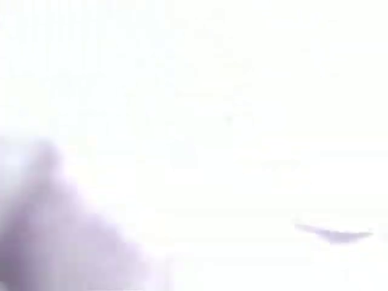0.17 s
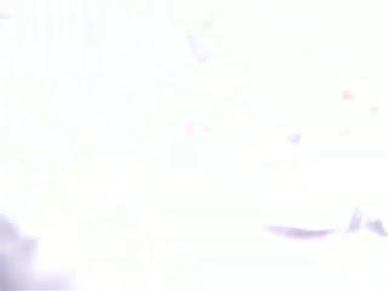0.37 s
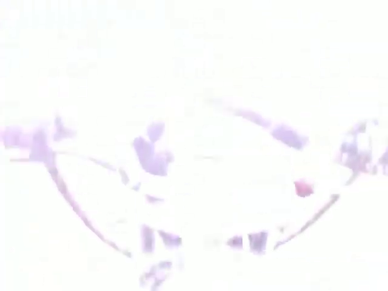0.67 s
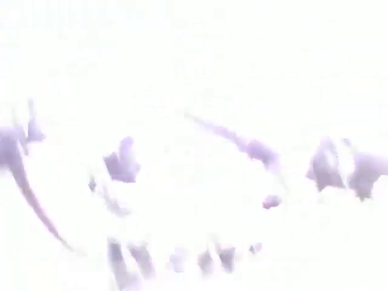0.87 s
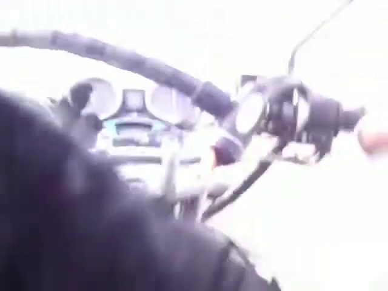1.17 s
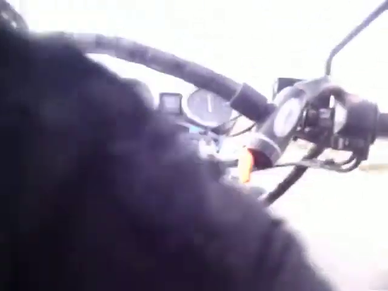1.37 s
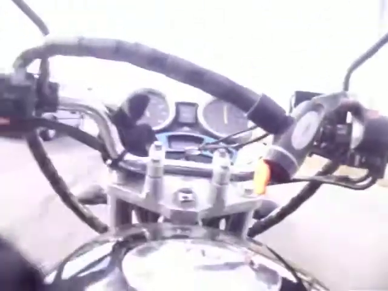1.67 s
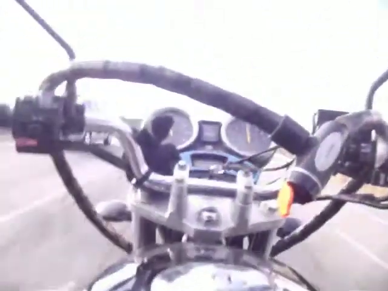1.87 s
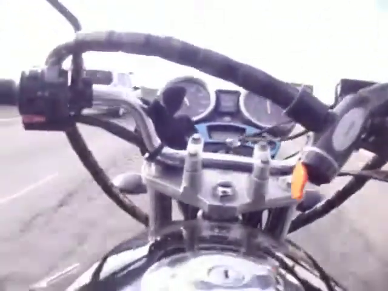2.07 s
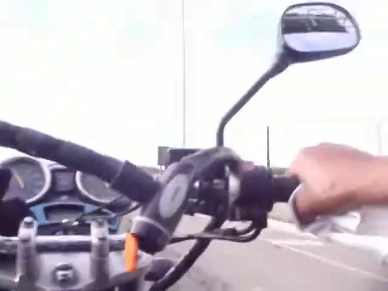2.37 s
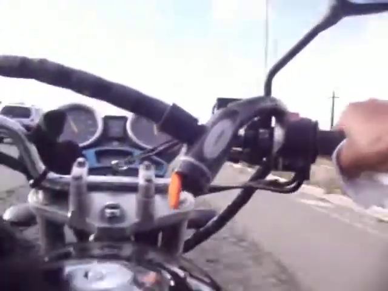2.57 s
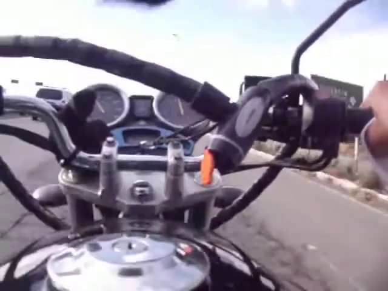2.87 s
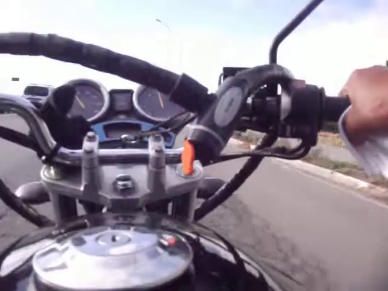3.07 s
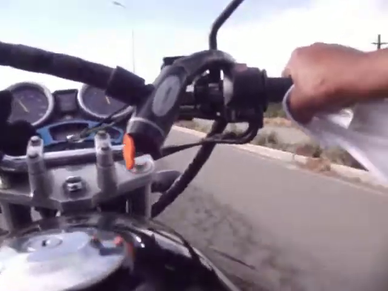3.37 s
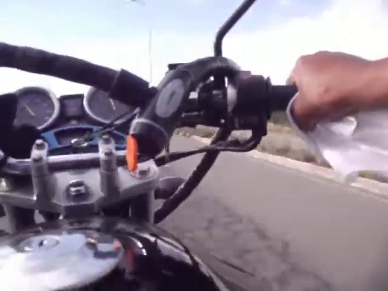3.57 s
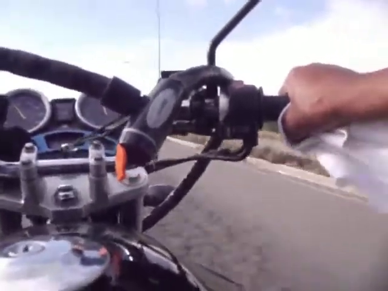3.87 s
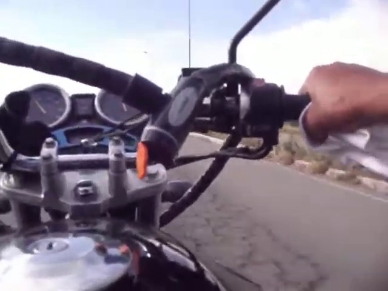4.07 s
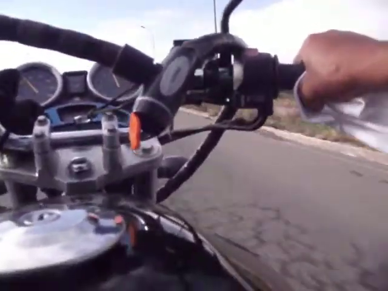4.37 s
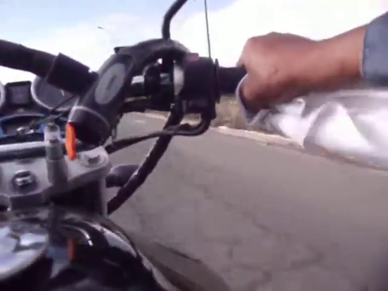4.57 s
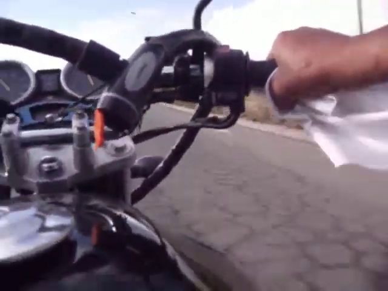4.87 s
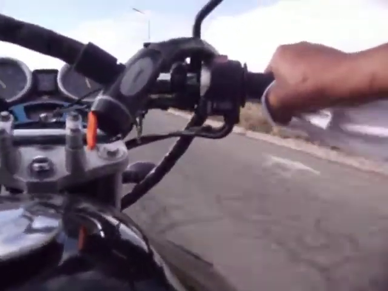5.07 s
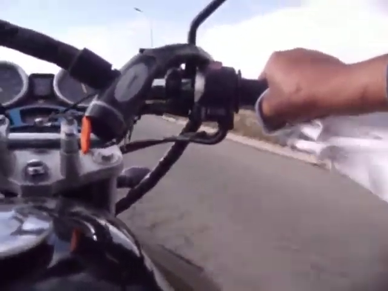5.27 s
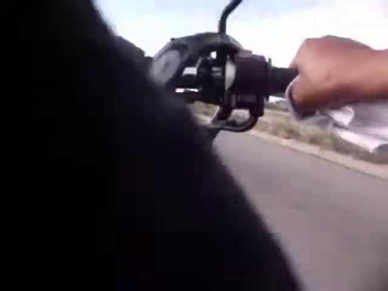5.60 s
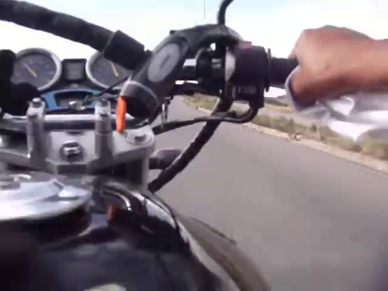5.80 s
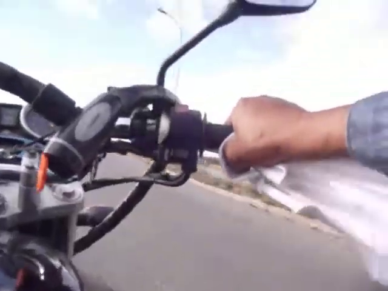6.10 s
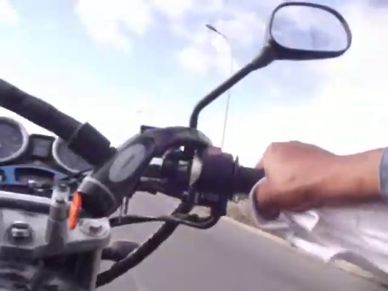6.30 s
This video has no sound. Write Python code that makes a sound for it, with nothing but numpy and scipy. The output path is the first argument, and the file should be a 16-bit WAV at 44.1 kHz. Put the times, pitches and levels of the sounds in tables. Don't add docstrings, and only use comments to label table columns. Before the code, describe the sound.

Gusty low wind roar and flickering hiss on a ridden motorcycle, broken by overloaded thumps, small plastic taps and a harsh fabric rasp near the end.

```python
import sys
import numpy as np
from scipy import signal
from scipy.fft import rfft, irfft, next_fast_len
from scipy.io import wavfile
from scipy.ndimage import map_coordinates

SR = 44100
rng = np.random.default_rng(int(sys.argv[2]) if len(sys.argv) > 2 else 0)


def output_pcm(signal):
    pcm = np.clip(np.atleast_2d(signal).T, -1, 1) * 32767
    wavfile.write(sys.argv[1], SR, np.round(pcm).astype(np.int16))


def volts_from_decibels(level):
    exponent = np.asarray(level, float) / 20
    return 10 ** exponent


N = 284003


def unit(x):
    return x / np.sqrt(np.mean(x ** 2) + 1e-20)


def wobble(rate):
    return map_coordinates(rng.standard_normal(int(N * rate / SR) + 4), [np.arange(N) * rate / SR])


def filtered(x, response):
    m = next_fast_len(N + SR // 2)
    return irfft(rfft(x, m) * response(np.fft.rfftfreq(m, 1 / SR)), m)[..., :N]


def rush(spectrum):
    f, v = np.transpose(spectrum)
    colour = lambda hz: volts_from_decibels(np.interp(np.log(hz + 1), np.log(f), v))
    return unit(filtered(rng.standard_normal(N), colour))


def add(track, s, sound):
    part = track[round(s * SR):][:len(sound)]
    part += sound[:len(part)]


# (time [s], wind strength [dB], port turned into the wind [dB])
GUSTS = [(0, -28.5, -9), (.4, -29, -9.5), (.7, -24.5, -5), (1.05, -26, -6.5), (1.08, -8.5, -12.5),
         (1.27, -22, -10.5), (2.3, -24, -11.5), (2.551, -20, -1.5), (2.66, -26, -9.5), (3.0, -25.5, -14),
         (3.18, -33.5, -9.5), (3.66, -33.5, -10.5), (3.7, -17.5, -12.5), (4.1, -27.5, -13.5),
         (4.5, -21.5, -12), (5.15, -32.5, -14), (5.3, -24, -12), (6.44, -25, -6)]


def gusts():
    s, *columns = np.transpose(GUSTS)
    return [np.interp(np.arange(N) / SR, s, column) for column in columns]


# (centre [s], change [dB])
HEAVES = [(.2, 0), (.41, -9), (.61, -7), (.82, 2.5), (.97, -5.5), (1.78, 7), (2.04, -13), (2.3, 1),
          (2.47, -8.5), (3.11, -7), (3.27, 10), (3.42, 6), (3.86, 4), (3.97, 7), (4.16, 7), (4.62, 5.5),
          (5.13, 7), (5.24, -10), (5.4, -3.5), (5.87, 8), (6.0, -1), (6.2, 4)]
# (frequency [Hz], density [dB per Hz])
LUMP_SPECTRUM = [(8.8, -23.5), (15, -4), (38, 5.5), (140, -12), (180, -40.5), (310, -120)]


def pressure_lumps(strength_db):
    mean_db, follow, heave_s = -18.5, .4, .035
    t = np.arange(N) / SR
    heave_db = sum(db * np.exp(-((t - centre) / heave_s) ** 2) for centre, db in HEAVES)
    level_db = mean_db + follow * (strength_db - strength_db.mean()) + heave_db
    swing_db = 1.5 * wobble(9) + 1.5 * wobble(14)
    return volts_from_decibels(level_db) * unit(volts_from_decibels(swing_db) * rush(LUMP_SPECTRUM))


# (frequency [Hz], density [dB per Hz])
ROAR_SPECTRUM = [(40, -24), (90, -2.5), (200, -5.5), (500, -16), (1000, -26.5), (2000, -44), (4000, -78.5)]
# (frequency [Hz], density [dB per Hz])
HISS_SPECTRUM = [(200, -6), (500, -5), (900, -4.5), (1400, -5), (2100, -5), (2900, -0.5), (3500, -15),
                 (4700, -34), (5500, -41), (6500, -60.5)]


def turbulence(strength_db, facing_db):
    flicker = 0.44 * wobble(18) + 0.9 * wobble(45) + 0.86 * wobble(160)
    flicker = 2.2 * np.tanh(flicker / 2.2)
    hiss_burst, roar_burst = eddies()
    hiss_burst = hiss_burst * unit(volts_from_decibels(3.5 * wobble(110)))
    steady_roar = volts_from_decibels(strength_db) * unit(volts_from_decibels(3.35 * flicker + 1.3 * wobble(30)))
    steady_hiss = volts_from_decibels(strength_db + facing_db) * unit(volts_from_decibels(3.94 * flicker + 3.6 * wobble(400)))
    roar = (steady_roar + roar_burst) * rush(ROAR_SPECTRUM)
    hiss = (steady_hiss + hiss_burst) * rush(HISS_SPECTRUM)
    return roar, hiss


def wind():
    stiff_at = .72
    strength_db, facing_db = gusts()
    kicks, share = vortex_kicks()
    roar, hiss = turbulence(strength_db, facing_db)
    buffet = share * (pressure_lumps(strength_db) + roar) + hiss
    return buffet / (1 + np.abs(buffet / stiff_at) ** 4) ** (1 / 4) + kicks


# (frequency [Hz], density [dB per Hz])
ROAD_SPECTRUM = [(59, -24.5), (100, 2), (346, -13), (1420, -32), (2280, -31), (2840, -21.5), (3860, -34.5),
                 (5240, -34), (5800, -44.5), (7540, -81.5), (12800, -120)]


def road():
    return volts_from_decibels(-39 + 0.52 * wobble(3.6)) * rush(ROAD_SPECTRUM)


# (centre [s], roar [dB], length [s])
THUDS = [(.138, -21, 0.0067), (0.306, -21.5, 0.022), (0.436, -23, 0.015), (0.685, -19, 0.021),
         (1.312, -27, .006), (1.837, -19, .009), (2.23, -14.5, 0.01), (2.306, -15, 0.0076),
         (2.563, -18.5, .02), (2.82, -21.5, 0.018), (3.164, -26, 0.0029), (3.56, -20, 0.0046),
         (3.768, -12, 0.0041), (4.15, -19, 0.0099), (4.345, -13, 0.0042), (4.784, -20, 0.0046),
         (4.922, -17.5, 0.0037), (5.058, -12, 0.024), (5.106, -14.5, .005), (4.035, -19, .005),
         (3.986, -11.5, 0.031), (5.494, -5.5, .004), (5.246, -19.5, 0.018), (5.321, -27, 0.0062),
         (5.7, -22, 0.024), (5.96, -36, 0.01), (6.143, -16, 0.0035), (6.223, -8.5, 0.0034),
         (6.328, -26, .014), (6.43, -17, 0.0066)]
# (centre [s], hiss [dB], length [s])
HEAD_ON = [(0.211, -19, 0.025), (.495, -25.5, .025), (0.617, -14.5, 0.0056), (0.658, -21.5, 0.0091),
           (0.723, -17, 0.012), (.79, -15.5, 0.0081), (0.841, -17, 0.011), (0.889, -20, 0.02),
           (0.933, -15, 0.011), (1.164, -6, .004), (1.231, -9.5, 0.022), (1.274, -12, .012),
           (1.375, -22.5, 0.049), (1.434, -10.5, 0.026), (1.504, -15, 0.017), (1.624, -23, 0.0038),
           (1.905, -14.5, 0.0085), (1.942, -12, .016), (2.126, -15.5, .005), (2.187, -12, 0.0042),
           (2.367, -16, 0.041), (2.399, -10.5, 0.018), (2.416, -16.5, 0.016), (2.504, -15.5, 0.022),
           (2.567, -20.5, 0.081), (2.631, -16.5, 0.028), (2.921, -15.5, .01), (2.997, -10.5, 0.023)]
# (centre [s], hiss [dB])
SPITS = [(.464, -20), (.487, -20), (.508, -20), (.578, -20), (.595, -22), (.864, -22), (.952, -25),
         (.992, -29), (1.253, -16), (1.282, -13), (1.298, -5), (1.345, -17), (1.368, -17), (1.417, -13),
         (1.466, -19), (1.512, -12), (1.572, -19), (1.97, -16), (2.443, -20), (2.513, -15), (2.6, -15),
         (2.686, -24), (2.71, -26), (3.258, -25), (3.767, -12), (4.396, -20.5), (4.435, -24),
         (4.465, -22.5), (4.763, -30), (6.205, -19)]
# (centre [s], hiss [dB], length [s])
SIDE_ON = [(2.726, -28, 0.0072), (3.232, -21, 0.016), (3.274, -19, 0.0027), (3.299, -21.5, .008),
           (3.387, -18, 0.0074), (3.433, -18.5, 0.016), (3.491, -19, 0.0051), (3.518, -24.5, .004),
           (3.586, -23.5, .008), (3.621, -25.5, 0.013), (3.856, -12.5, 0.015), (3.965, -14, 0.0072),
           (3.989, -17, 0.0077), (4.073, -19, 0.013), (4.275, -22.5, 0.015), (4.322, -19, 0.03),
           (4.389, -13, .0025), (4.414, -21.5, .009), (4.485, -19.5, 0.02), (4.541, -26.5, 0.037),
           (4.828, -14.5, 0.0031), (4.862, -21.5, 0.033), (5.227, -15, .004), (5.295, -21, .014),
           (5.404, -19.5, .013), (5.803, -19.5, 0.023), (5.869, -33, 0.0068), (6.068, -22.5, 0.014),
           (6.255, -24, .015), (6.414, -25.5, 0.023)]


def eddies():
    bursts = [(s, db, db - 8.5, length) for s, db, length in HEAD_ON]  # centre, hiss dB, roar dB, length
    bursts += [(s, db, db + 3.5, length) for s, db, length in SIDE_ON]
    bursts += [(s, db - 8, db, length) for s, db, length in THUDS]
    bursts += [(s, db, db - 9, 0.0043) for s, db in SPITS]
    for s, height, length in KICKS:
        size_db = 20 * np.log10(abs(height))
        bursts.append((s, size_db - 19, size_db - 3.5, 1.42 * length))
    hiss, roar = np.zeros(N), np.zeros(N)
    t = np.arange(-SR // 25, SR // 25) / SR
    for s, hiss_db, roar_db, length in bursts:
        add(hiss, s + t[0], volts_from_decibels(hiss_db - 6.0) * np.exp(-(t / (0.43 * length)) ** 2))
        add(roar, s + t[0], volts_from_decibels(roar_db - 3.0) * np.exp(-(t / (0.49 * length + 0.0025)) ** 2))
    return hiss, roar


# (start [s], end [s], level [dB])
SCRAPES = [
    (5.469, 5.492, 6),
    (5.496, 5.516, -12.5),
    (5.571, 5.603, -16),
    (1.048, 1.066, -18.5),
    (1.08, 1.105, -12.5),
    (5.238, 5.252, -14.5),
    (5.446, 5.466, -26.5),
    (4.662, 4.712, -27),
    (1.064, 1.0705, -2),
]


def glove():
    t, edge_s = np.arange(N) / SR, 0.0036
    stroke = sum(volts_from_decibels(db) * np.clip(np.minimum(t - start, end - t) / edge_s, 0, 1)
                 for start, end, db in SCRAPES)
    return stroke * unit(volts_from_decibels(4 * wobble(500))) * rush(HISS_SPECTRUM)


# (time [s], swing [dB], swing [Hz], t60 [s], shudder [dB])
SLAMS = [
    (1.0686, 25, 42, .07, -30),
    (1.0818, 20, 500, .003, -30),
    (3.6682, 20, 19, .11, 32),
    (3.6985, 5, 110, .02, -30),
    (5.2385, 0, 120, .03, -30),
    (5.4735, 9, 24, .09, -20),
    (5.4965, 5, 40, .03, -20),
]


def slams():
    out, t = np.zeros(N), np.arange(SR // 5) / SR
    for s, db, hz, t60, shudder_db in SLAMS:
        swing = volts_from_decibels(db - 60 * t / t60) * np.sin(2 * np.pi * hz * t + .45)
        shudder = volts_from_decibels(shudder_db - 60 * t / .04) * np.sin(2 * np.pi * 156 * t)
        add(out, s, swing + shudder)
    return out


# (centre [s], signed height [full scale], length [s])
KICKS = [(1.14, 0.53, 0.0036), (1.164, -0.6, 0.0024), (1.189, -0.5, 0.0043), (1.218, 0.51, 0.008),
         (1.647, 0.64, 0.005), (1.932, -0.73, 0.0057), (1.969, -0.68, 0.0035), (2.228, -0.4, 0.015),
         (3.716, 0.51, 0.0077), (3.722, -1.3, 0.0035), (3.737, 0.35, 0.0052), (3.772, -0.78, 0.0014),
         (3.825, 0.92, 0.0025), (3.84, -0.97, 0.0013), (3.861, -0.77, 0.0048), (3.884, -0.89, 0.0018),
         (3.978, -1, 0.0038), (3.992, 0.9, 0.0054), (3.999, 0.69, 0.0043), (4.064, -0.76, 0.004),
         (4.222, -0.62, 0.0027), (4.442, -0.71, 0.0034), (4.614, -0.65, 0.0062), (5.058, -1.3, 0.0025),
         (5.518, -0.65, 0.0053), (5.605, 0.49, 0.0068), (5.719, -0.46, 0.0076), (6.063, -0.63, 0.0081),
         (6.217, -0.47, 0.014), (6.254, 0.47, 0.0068)]


def vortex_kicks():
    out, calm, t = np.zeros(N), np.zeros(N), np.arange(-SR // 25, SR // 25) / SR
    for s, height, length in KICKS:
        add(out, s + t[0], 1.156 * height * np.exp(-(t / (0.49 * length)) ** 2))
        add(calm, s + t[0], np.exp(-(t / (length + 0.0016)) ** 2))
    return out, np.exp(-1.5 * calm)


# (frequency [Hz], width [Hz], level [dB])
CAVITY = [(2600, 380, 0), (4700, 900, -22)]


def port_response(f):
    port = sum((-1) ** k * volts_from_decibels(db) * 1j * f * width / (centre * centre - f * f + 1j * f * width)
               for k, (centre, width, db) in enumerate(CAVITY))
    padding = 1 / (1 - (f / 3100) ** 2 + 1j * f / 3300) ** 2
    return port * padding * volts_from_decibels(-8.0)


# (time [s], click [dB], low ring [dB], high ring [dB])
FREE_TAPS = [(1.5255, -13.5, -28, -29), (1.5984, -7.5, -32.5, -32), (1.6453, -17.5, -34, -38),
             (1.6557, -27, -27.5, -30), (1.7329, -16, -27, -24.5), (1.7704, -36, -27, -23),
             (1.7964, -31, -47, -34), (2.3376, -2, -22, -27.5), (2.8947, -31, -33, -48.5),
             (3.0404, -3, -26.5, -32.5), (3.3432, -20, -37.5, -44), (4.2388, -5.5, -25, -37),
             (4.3001, -12, -22.5, -25), (4.6619, -9.5, -31.5, -30), (4.7144, -4, -33.5, -31.5),
             (5.2083, -42, -26.5, -39), (5.4152, -3.5, -29, -34)]
# (time [s], click [dB], low ring [dB], high ring [dB])
HELD_TAPS = [
    (5.2359, 3, -17.5, -23),
    (5.4453, -12, -25.5, -22),
    (5.4625, -1.5, -17, -24),
    (5.474, 6.5, -9, -28.5),
    (5.5011, 1, -6, -26),
    (5.5082, -2, -15, -23),
    (5.5123, -1.5, -19.5, -25.5),
    (5.5735, 1, -8.5, -24),
    (5.5851, 2, -22, -28),
]
# (frequency [Hz], t60 [s])
SHELL_MODES = [(1712, .13), (2972, .09)]


def knocks(taps, ring_share):
    clicks, ring, t = np.zeros(N), np.zeros(N), np.arange(SR // 5) / SR
    for s, click_db, *ring_db in taps:
        settling = .12 * volts_from_decibels(-60 * t[1:] / .012) * rng.standard_normal(len(t) - 1)
        add(clicks, s, volts_from_decibels(click_db + 33.0) * np.r_[1, settling])
        for (hz, t60), level_db in zip(SHELL_MODES, ring_db):
            decay = volts_from_decibels(level_db + 1.0 - 60 * t / (t60 * ring_share))
            add(ring, s, decay * np.sin(2 * np.pi * hz * t))
    rattle = volts_from_decibels(4 * wobble(150))
    return rattle * ring + filtered(clicks, port_response)


def scene():
    taps = knocks(FREE_TAPS, ring_share=.9) + knocks(HELD_TAPS, ring_share=.3)
    return (wind() + taps + slams() + glove() + road())[None]


def overload(x, top):
    return x / (1 + np.abs(x / top) ** 50) ** (1 / 50)


def top_cut(x):
    return signal.sosfilt(signal.butter(12, 16470, fs=SR, output="sos"), x)


def record(dry):
    clipped = overload(dry - .005, top=0.72)
    narrow = filtered(clipped, lambda hz: 1 / (1 + (hz / 5680) ** 40))
    return top_cut(overload(narrow, top=0.71))


dry = scene()
out = record(dry)
output_pcm(out)
```